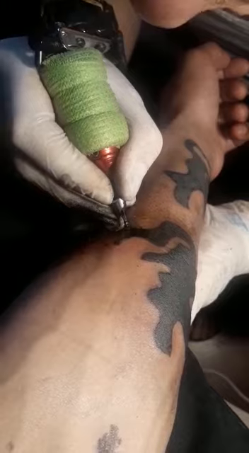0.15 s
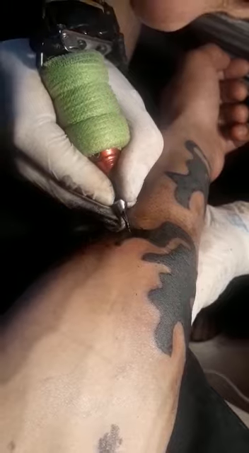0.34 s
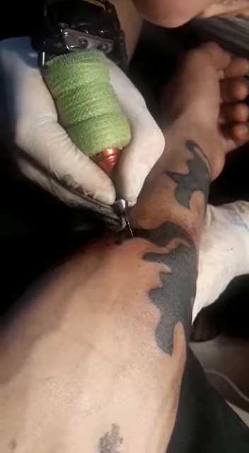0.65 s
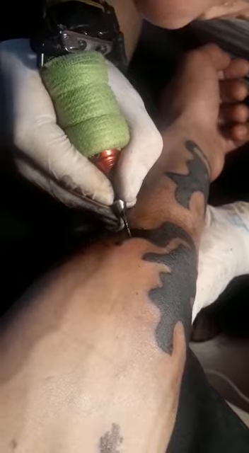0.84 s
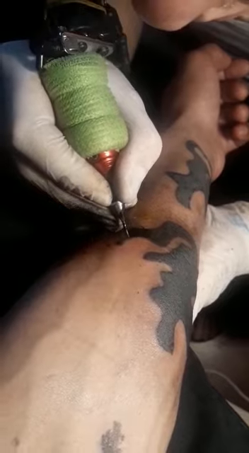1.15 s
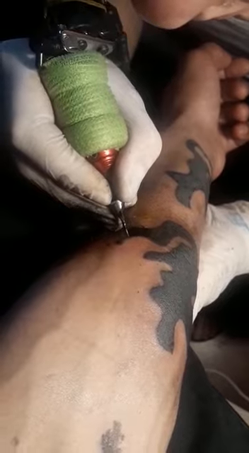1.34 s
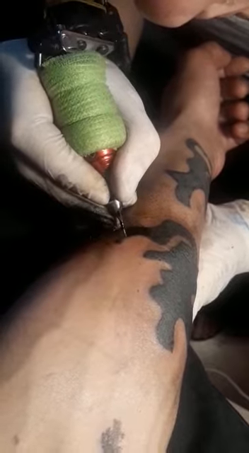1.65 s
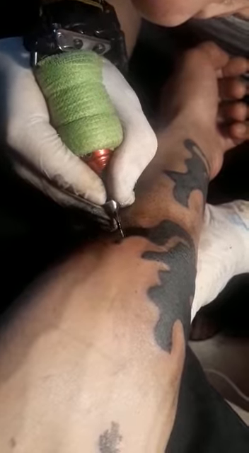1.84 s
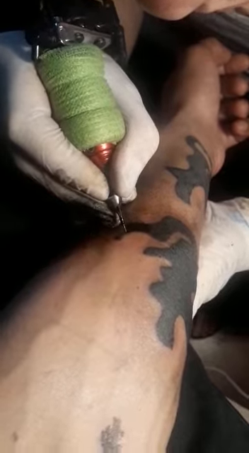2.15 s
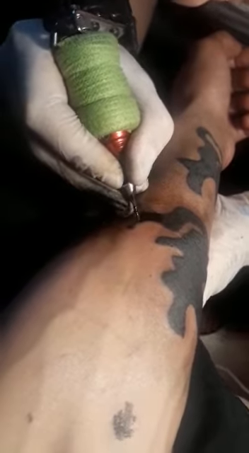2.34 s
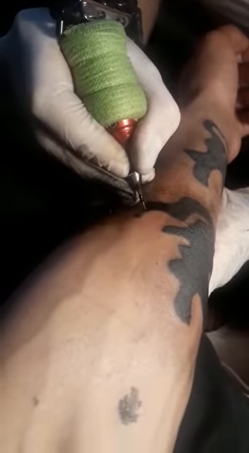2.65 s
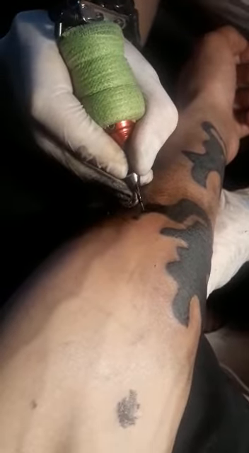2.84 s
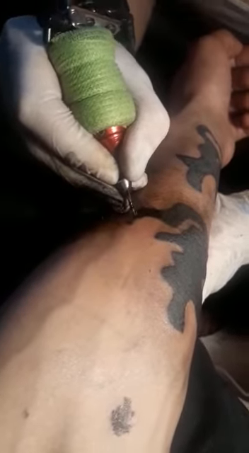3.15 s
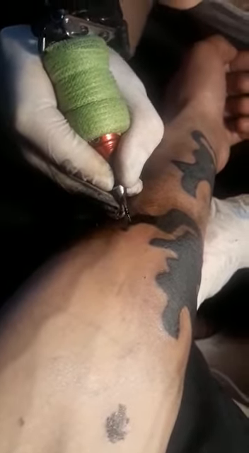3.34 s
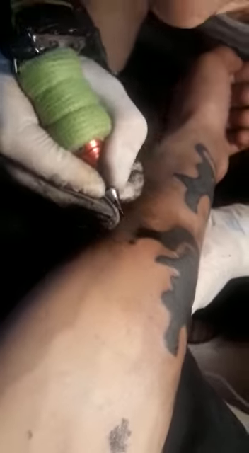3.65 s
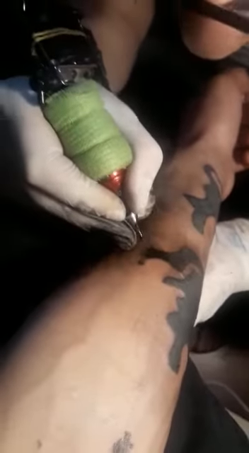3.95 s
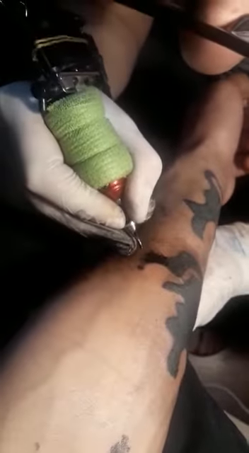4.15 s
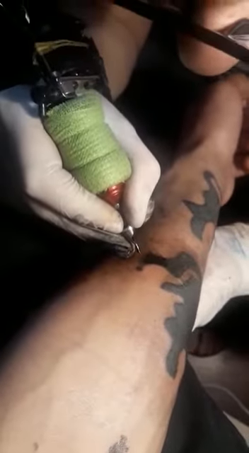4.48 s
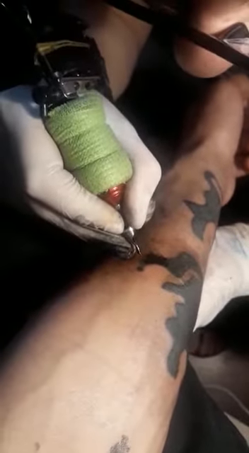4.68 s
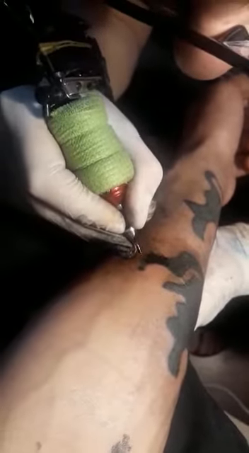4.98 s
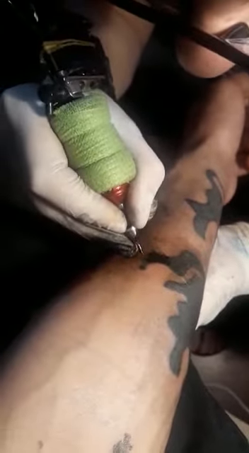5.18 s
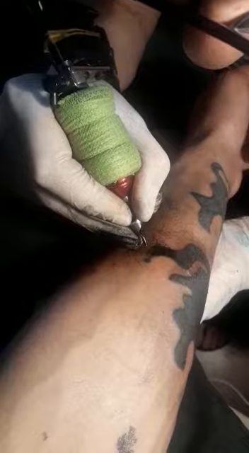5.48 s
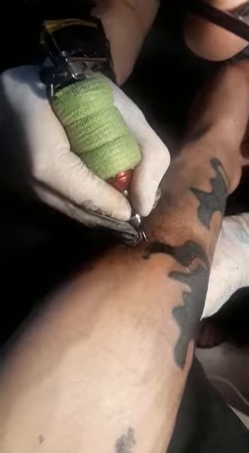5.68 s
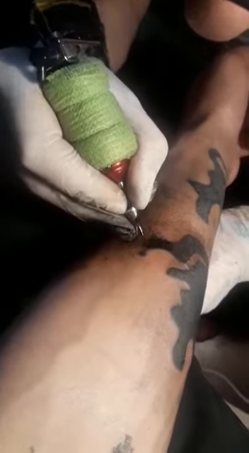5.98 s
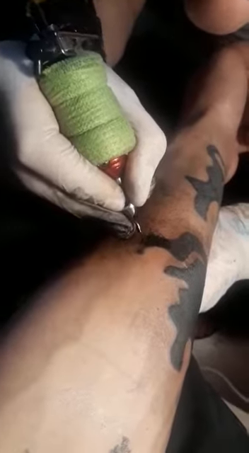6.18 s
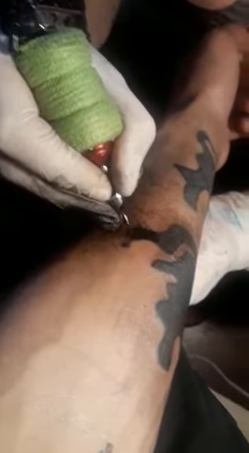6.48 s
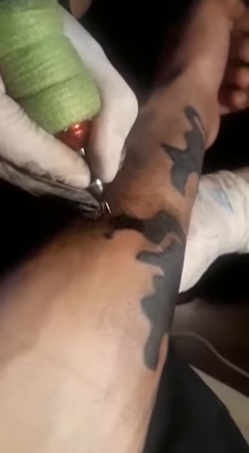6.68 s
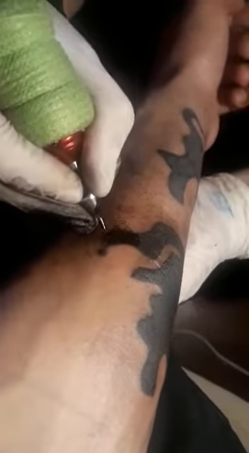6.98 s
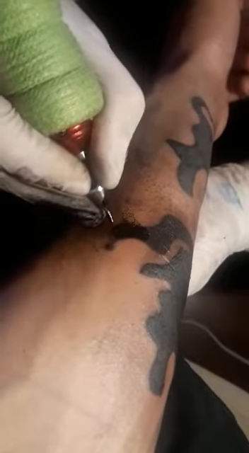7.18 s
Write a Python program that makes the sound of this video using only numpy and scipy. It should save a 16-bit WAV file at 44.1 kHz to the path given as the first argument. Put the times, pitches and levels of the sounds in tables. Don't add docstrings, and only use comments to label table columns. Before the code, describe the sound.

Rapid, even metal strikes fuse into a rasping, nasal buzz with a sizzling top edge and little bass. Its pitch hardly moves, but its colour shifts as the hand turns and the needle loads. Two short pauses expose soft, patchy air rumble. A dull knock comes late. Close phone pickup, short bright room reverberation.

```python
import sys
import numpy as np
from scipy import signal
from scipy.io import wavfile
from scipy.ndimage import uniform_filter1d

SR = 44100
rng = np.random.default_rng(int(sys.argv[2]) if len(sys.argv) > 2 else 0)


def gain_from_decibels(decibels):
    exponent = np.asarray(decibels, float) / 20
    return 10 ** exponent


def transcribe(u):
    v = np.clip(np.atleast_2d(u).T, -1, 1)
    q = np.round(v * 32767).astype(np.int16)
    wavfile.write(sys.argv[1], SR, q)


N = 322812
LEAD = SR // 2


def evened(x):
    return x / np.sqrt(np.mean(x ** 2) + 1e-20)


def read(points, hz):
    f, value = np.transpose(points)
    return np.interp(np.log(hz + 1), np.log(f + 1), value)


def drift(per_s):
    knots = rng.standard_normal(int((N + LEAD) / SR * 200) + 2)
    smooth = signal.lfilter([1], [1, -np.exp(-2 * np.pi * per_s / 200)], knots)
    return evened(np.interp(np.arange(N + LEAD) / SR, np.arange(len(knots)) / 200, smooth))


# f/Hz, density/dB per Hz
AIR_SPECTRUM = [(18, -51.5), (30, -8.5), (120, -7), (258, -6.5), (382, -6.5), (424, -11), (662, -8.5),
                (981, -13), (1060, -16), (1270, -20.5), (4730, -42.5), (6480, -54), (15800, -56)]
# f/Hz, level/dB
HUM_LINES = [(156, -67), (199.2, -54.5), (274, -58.5)]
AIR_DB = -47


def air():
    frames, hz = N // 512 + 5, np.fft.rfftfreq(2048, 1 / SR)
    real, imag, patches = rng.standard_normal((frames, 1025, 3)).T
    patches = evened(uniform_filter1d(uniform_filter1d(patches, 8, 0), 6, 1))
    spectra = (real + 1j * imag) * gain_from_decibels(read(AIR_SPECTRUM, hz)[:, None] + 0.65 * patches)
    out = gain_from_decibels(AIR_DB) * evened(signal.istft(spectra, nperseg=2048, noverlap=1536)[1][:N])
    for line_hz, db in HUM_LINES:
        level = np.sqrt(2) * gain_from_decibels(db + 1.8 * drift(2.8)[:N])
        phase = 2 * np.pi * np.cumsum(line_hz + 1.57 * drift(2.94)[:N]) / SR
        out += level * np.sin(phase)
    return out


# t/s, level/dB, f/Hz
HAND_THUMPS = [
    (3.661, -33, 139),
    (6.606, -27.5, 383),
]


def thumps():
    t = np.arange(N) / SR
    out = np.zeros(N)
    for s, db, hz in HAND_THUMPS:
        out += gain_from_decibels(db) * np.sin(2 * np.pi * hz * (t - s)) * np.exp(-((t - s) * hz / 0.67) ** 2)
    return out


# t/s, strike rate/Hz, blow level/dB, coil turn toward phone/0-1, needle bar load/0-1
HAND_MOVES = [(0.0, 105.2, -24, 0.67, 0.4), (0.55, 105.4, -24, 0.78, 0.35), (1.16, 105.0, -24, .75, .2),
              (1.3, 105.3, -24, 0.88, 0.2), (2.16, 105.1, -24, 0.75, 0.4), (2.5, 105.15, -24.5, 0.46, 0.72),
              (2.95, 104.9, -24.5, 0.4, 0.62), (3.38, 104.75, -26, 0.2, 0), (3.58, 105.5, -23, 0.68, .4),
              (4.3, 105.5, -26, 0, 0.5), (5.0, 105.4, -25.5, 0.05, 0.33), (5.05, 105.15, -27, 0.47, 0.7),
              (5.44, 105.0, -27, 0, 0.72), (5.93, 104.75, -26, 0.88, 0.85), (6.5, 104.75, -25.5, .8, 0.85),
              (6.68, 104.8, -23.5, .7, 0.86), (6.95, 104.7, -24.5, 0.33, 0.91),
              (7.31, 104.6, -25, 0.16, 0.8)]
# first full blow t/s, power cut t/s, coasting level/dB
POWER_ON = [
    (-.2962, .108, -34),
    (0.4267, 3.685, -27),
    (4.2357, 7.4, -15),
]
# multiple of strike rate, level/dB
COIL_ORDERS = [(1, -12.5), (2, -17.5), (3, -4.5), (4, -7), (5, -4.5), (6, -15.5), (7, -3.5), (8, -1.5),
               (9, 1), (10, -15), (11, -5)]
# f/Hz, level/dB
SUPPLY_LINES = [(80.7, -58.5), (150.7, -54.5)]
COIL_DB = -44.5


def coil():
    t, hand = np.arange(N) / SR, np.array(HAND_MOVES)
    turns = np.cumsum(np.interp(t, hand[:, 0], hand[:, 1])) / SR
    on = sum((t > first - .01) & (t < cut) for first, cut, _ in POWER_ON) * 1.
    on = uniform_filter1d(on, 900)
    tones, supply = np.zeros(N), np.zeros(N)
    for order, db in COIL_ORDERS:
        tones += gain_from_decibels(db + 1.1 * drift(0.68)[:N]) * np.sin(2 * np.pi * (order * turns + rng.random()))
    for hz, db in SUPPLY_LINES:
        supply += gain_from_decibels(db + 3 + 1.3 * drift(2.5)[:N]) * np.sin(2 * np.pi * hz * t)
    return on * (gain_from_decibels(COIL_DB) * evened(tones) + supply)


def ring(modes, rise_s, rattle_s):
    t = np.arange(2048) / SR
    tones = np.zeros(len(t))
    for k, (hz, width_hz, db) in enumerate(modes):
        decay = np.exp(-np.pi * width_hz * t)
        tones += (-1) ** k * gain_from_decibels(db) * width_hz * np.sin(2 * np.pi * hz * t) * decay
    loose = rng.standard_normal(len(t)) * np.exp(-t / rattle_s)
    loose *= .5 * (rattle_s > .001) / np.sqrt(rattle_s * SR / 20)
    soft = 1 - np.exp(-(t / rise_s) ** 2)
    return signal.lfilter(np.r_[1, loose[1:]], [1], tones * soft)


def blows(times_s, sizes):
    place = times_s * SR + LEAD
    at = np.floor(place).astype(int)[:, None] + np.arange(-15, 17)
    lag = at - place[:, None]
    shape = sizes[:, None] * np.sinc(lag) * np.cos(np.pi * lag / 32) ** 2
    inside = at < N + LEAD
    return np.bincount(at[inside], shape[inside], N + LEAD)


# t/s, timing scatter/s
NEEDLE_SNAGS = [(.84, 8e-6), (2.97, 8e-6), (3.17, 6e-6), (3.25, 6e-6), (3.45, 1.2e-5), (6.29, 8e-6),
                (6.8, 1.3e-5)]
SPIN_UP_HZ, SPIN_UP_S = 1, 0.023
ARMATURE_AWAY_DB, ARMATURE_TURN_DB = -9, 9.5
BAR_AWAY_DB, BAR_TURN_DB, BAR_LOAD_DB = -8, -4.5, 7
FRAME_TURN_DB, SPRING_DB = -1, -31
TIP_DB, TIP_TURN_DB, TIP_LOAD_DB = -9.5, -10.5, -.7
GRIP_AWAY, GRIP_TURN = 0.068, 0.46


def strikes(power, jitter_s=4e-6, uneven_db=0.29):
    (s, rate_hz, *controls), (first, cut, coast_db) = np.transpose(HAND_MOVES), power
    t = np.arange(first - .04, cut + .2, 1 / SR)
    deficit_hz = SPIN_UP_HZ * np.exp(-np.maximum(t - first, 0) / SPIN_UP_S)
    turns = np.cumsum(np.interp(t, s, rate_hz) - deficit_hz) / SR
    turns -= np.interp(first, t, turns)
    k = np.arange(-3, int(turns[-1]))
    chance = rng.standard_normal((400, 2))[:len(k)]
    when = np.interp(k, turns, t)
    snag_s = sum(wide * np.exp(-((when - at) / 0.034) ** 2) for at, wide in NEEDLE_SNAGS)
    when += chance[:, 0] * (jitter_s + snag_s)
    swing_db = -7.5 * np.maximum(-k, 0) ** 2.0 - 2.7 * np.exp(-np.maximum(k, 0) / 1.6)
    coast_db = np.where(when > cut, coast_db - 150 * (when - cut), 0)
    blow_db, turn, load = (np.interp(np.minimum(when, cut), s, c) for c in controls)
    parts_db = np.array([
        blow_db,
        blow_db + BAR_AWAY_DB + BAR_TURN_DB * turn + BAR_LOAD_DB * load,
        blow_db + ARMATURE_AWAY_DB + ARMATURE_TURN_DB * turn,
        SPRING_DB + 0 * when,
        blow_db + FRAME_TURN_DB * turn,
        blow_db + TIP_DB + TIP_TURN_DB * turn + TIP_LOAD_DB * load])
    coast_share = np.array([[2.5], [2.2], [1], [2.6], [2.5], [2.5]])
    parts_db += swing_db + uneven_db * chance[:, 1] + coast_db * coast_share
    return np.vstack([when, parts_db, GRIP_AWAY + GRIP_TURN * turn, load])


# f/Hz, width/Hz, level/dB
FRAME_MODES = [(1270, 43, -0.5), (1405, 49, 0), (1462, 69, -4.5), (1780, 120, -8.5), (1770, 23, -12),
               (1907, 55, 6.5), (2016, 28, -6), (2127, 37, 2.5)]
TUBE_LOOSE_MODES = [(2380, 280, -11), (2901, 630, 0.5), (3250, 70, -1)]
TUBE_GRIPPED_MODES = [(2650, 700, -8), (3176, 420, 3), (3630, 73, -3)]
BAR_SLACK_MODES = [(3794, 280, -0.085), (4140, 110, -0.92)]
BAR_TENSE_MODES = [(4056, 390, -5), (4375, 90, 0.5)]
ARMATURE_MODES = [(4755, 277, 5.5), (5350, 300, -18), (5670, 110, -12)]
SPRING_MODES = [(5955, 710, -6.5), (7320, 1500, -12.5), (8660, 1800, -16), (10900, 1400, -11.5),
                (12470, 990, -11), (12970, 370, 2), (13900, 600, 0.5), (14260, 1200, -3),
                (15280, 430, -0.5)]
# f/Hz, width/Hz, level/dB
TIP_MODES = [(5200, 400, 4), (5880, 400, -5.5), (6320, 260, -4), (7200, 410, -7.5)]
# lag/s, rise/s, rebound delay/s, rebound level/dB, rattle length/s
PART_CONTACTS = [
    (0.00038, 0.00017, .0045, -7, .0002),
    (0.00011, 0.00021, 0.0032, -13, .0002),
    (0.00026, 0.0002, 0.001602, -8.5, .0002),
    (0.0005025, 0.00055, 0.000599, -14.5, .0002),
    (0.000274, 0.00023, 0.007, -6.5, 0.0032),
    (0.000303, 0.00027, .0035, 2.5, .0002),
]
WAVER_DB, WAVER_HZ = 0.86, 2.9


def machine():
    when, blow, bar, armature, spring, frame, tip, grip, load = np.hstack([strikes(on) for on in POWER_ON])
    grip, tense = np.clip(grip, 0, 1), np.clip(load, 0, 1)
    at = np.clip((when * SR).astype(int), 0, N)
    parts = [(FRAME_MODES, gain_from_decibels(frame - 6.3), 0),
             (TUBE_LOOSE_MODES, gain_from_decibels(blow - 0.5) * np.sqrt(1 - grip), 1),
             (TUBE_GRIPPED_MODES, gain_from_decibels(blow - 3.5) * np.sqrt(grip), 1),
             (BAR_SLACK_MODES, gain_from_decibels(bar) * np.sqrt(1 - tense), 2),
             (BAR_TENSE_MODES, gain_from_decibels(bar) * np.sqrt(tense), 2),
             (ARMATURE_MODES, gain_from_decibels(armature), 3),
             (TIP_MODES, gain_from_decibels(tip), 5)]
    seat = 1.406 * when + 0.2 * drift(0.63)[at]
    for k in range(3):
        share = np.sqrt(2 / 3) * np.cos(seat + 2 * np.pi * k / 3)
        parts.append((SPRING_MODES, gain_from_decibels(spring) * share, 4))
    out = np.zeros(N + LEAD)
    for modes, sizes, row in parts:
        lag_s, rise_s, delay_s, rebound_db, rattle_s = PART_CONTACTS[row]
        shape = ring(modes, rise_s, rattle_s)
        shape /= np.sqrt(np.sum(shape ** 2) * (1 + gain_from_decibels(rebound_db) ** 2) * 105 / SR)
        late_s = lag_s + delay_s * (1 + 0.0087 * drift(1.3)[at])
        sizes = sizes * gain_from_decibels(WAVER_DB * drift(WAVER_HZ)[at])
        hits = blows(when + lag_s, sizes) + blows(when + late_s, sizes * gain_from_decibels(rebound_db))
        out += signal.oaconvolve(hits, shape)[:N + LEAD]
    return out


# f/Hz, t60/s
ROOM_T60 = [(500, 0.14), (1300, 0.36), (3500, 0.43), (9000, 0.44), (15000, 0.23)]
# f/Hz, level/dB
REFLECTION = [(1000, -24.5), (1650, -23), (2000, -30), (3000, -32.5), (4700, -30.5), (6500, -26.5),
              (9000, -31), (14000, -21.5)]


def room(x, turns_per_s=0.048):
    out = np.zeros(len(x))
    angle = 2 * np.pi * turns_per_s * np.arange(len(x)) / SR + 0.28 * drift(1.0)
    for k in range(3):
        taps = np.zeros(SR // 2)
        at = np.arange(60, SR // 2 - 10, 10)
        taps[at + rng.integers(0, 10, len(at))] = rng.choice([-1., 1.], len(at))
        hz, t, z = signal.stft(taps, SR, nperseg=256)
        tail_db = read(REFLECTION, hz)[:, None] - 60 * t / read(ROOM_T60, hz)[:, None]
        tail = signal.istft(z * gain_from_decibels(tail_db), SR, nperseg=256)[1]
        share = np.sqrt(2 / 3) * np.cos(angle + 2 * np.pi * k / 3)
        out += signal.fftconvolve(x * share, tail)[:len(x)]
    return out


def scene():
    no_bass = signal.butter(8, 1140, "high", fs=SR, output="sos")
    buzz = signal.sosfilt(no_bass, machine())
    near = (gain_from_decibels(-1.0) * buzz + room(buzz))[LEAD:]
    return (near + coil() + air() + thumps())[None]


def roll_off(x):
    return signal.sosfilt(signal.butter(12, 16360, fs=SR, output="sos"), x)


def record(dry):
    clear = signal.sosfilt(signal.butter(4, 42, "high", fs=SR, output="sos"), dry)
    band_limit = signal.firwin(801, 15780, window=("kaiser", 9), fs=SR)
    clear = signal.oaconvolve(clear, band_limit[None], "same")
    return roll_off(clear)


dry = scene()
out = record(dry)
transcribe(out)
```